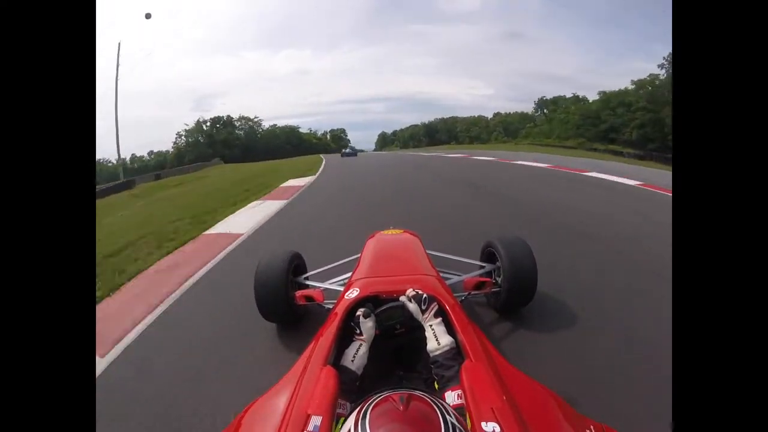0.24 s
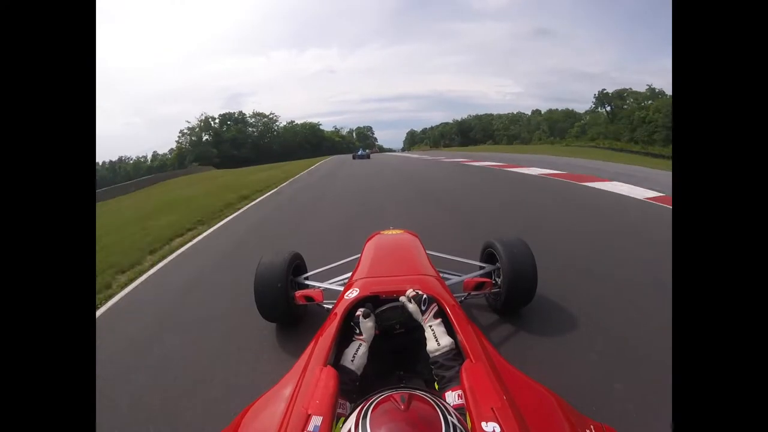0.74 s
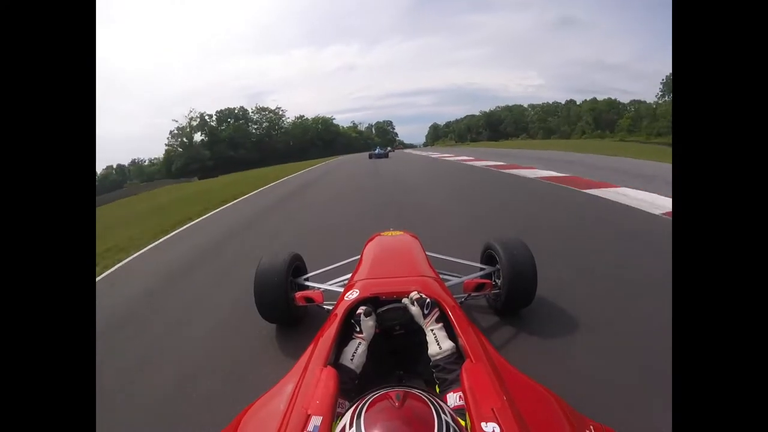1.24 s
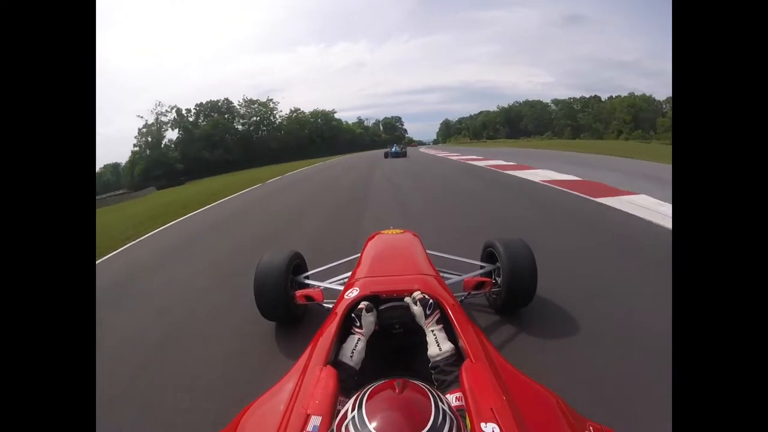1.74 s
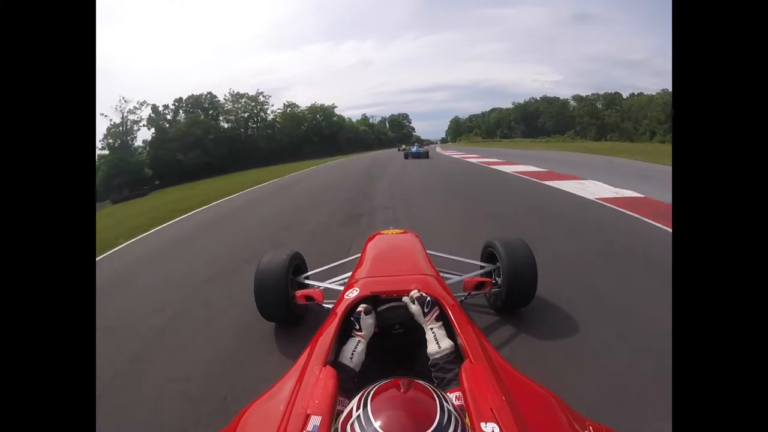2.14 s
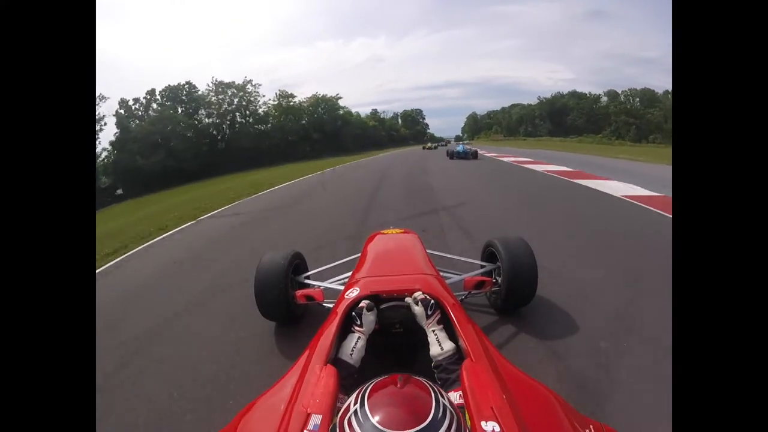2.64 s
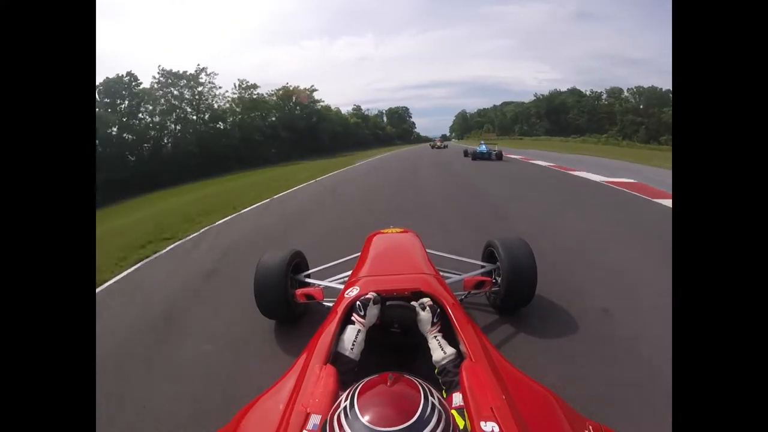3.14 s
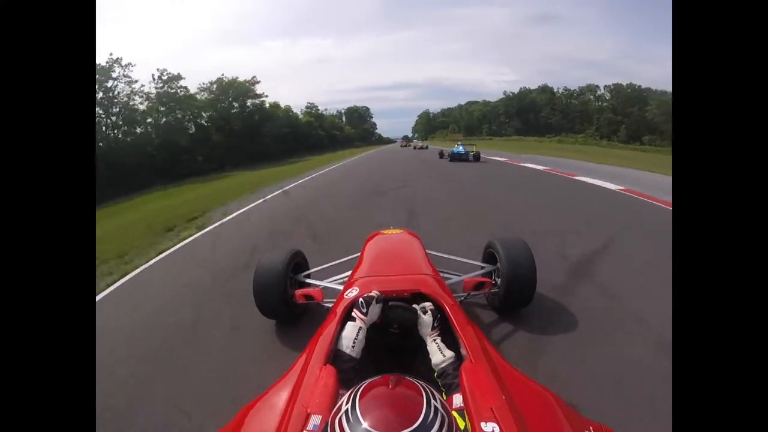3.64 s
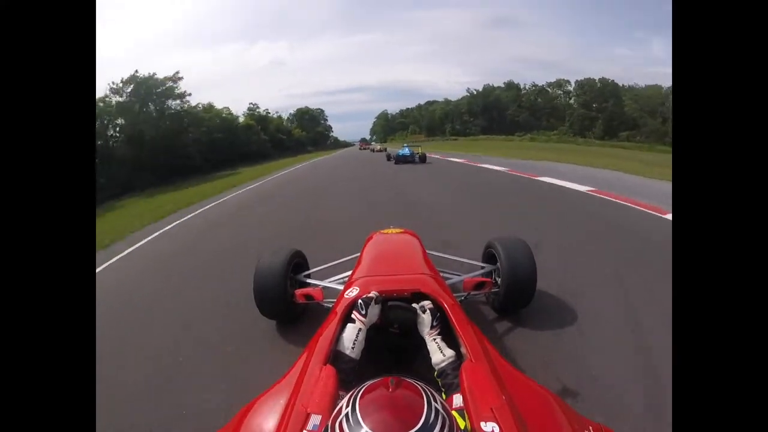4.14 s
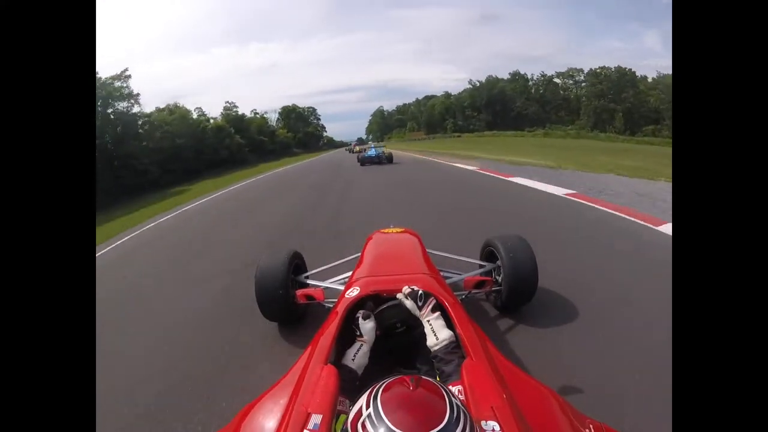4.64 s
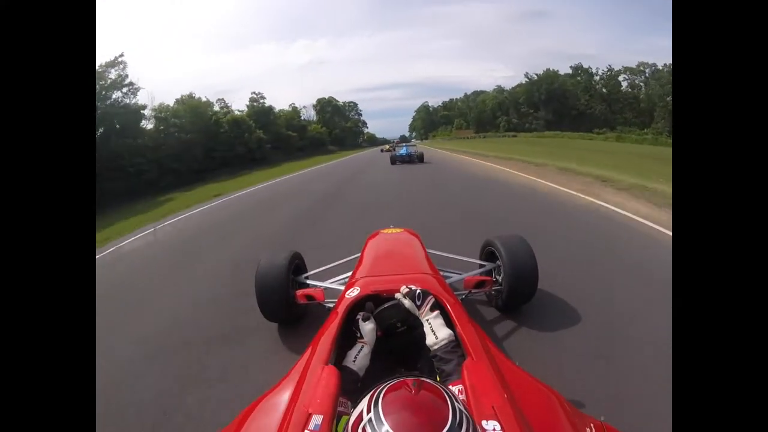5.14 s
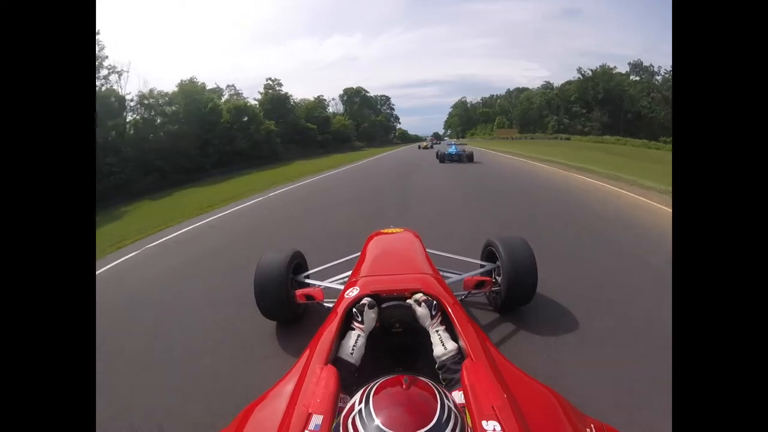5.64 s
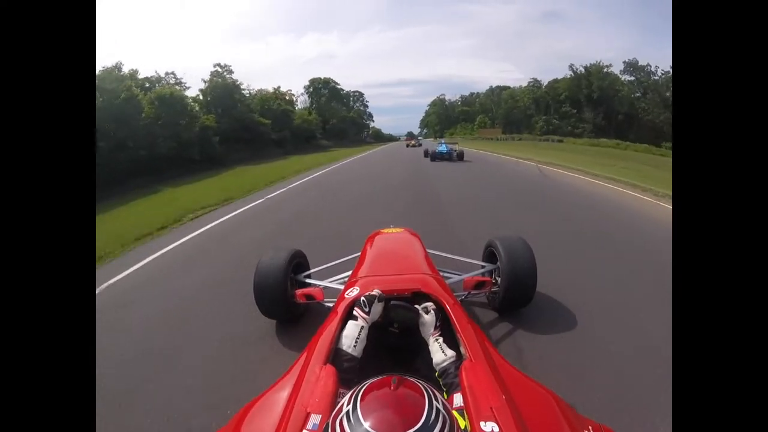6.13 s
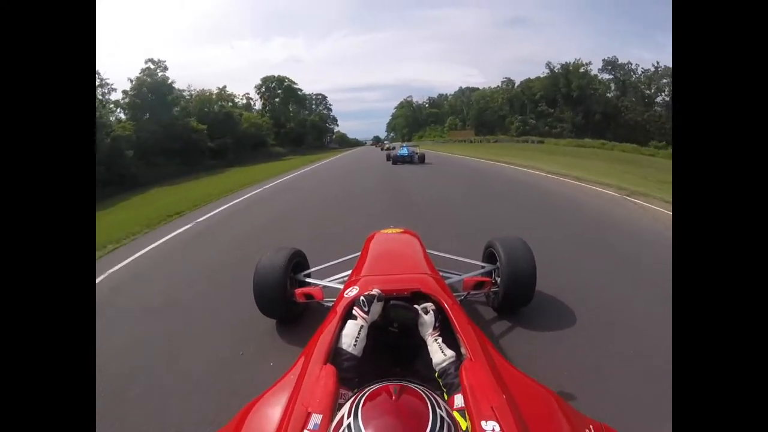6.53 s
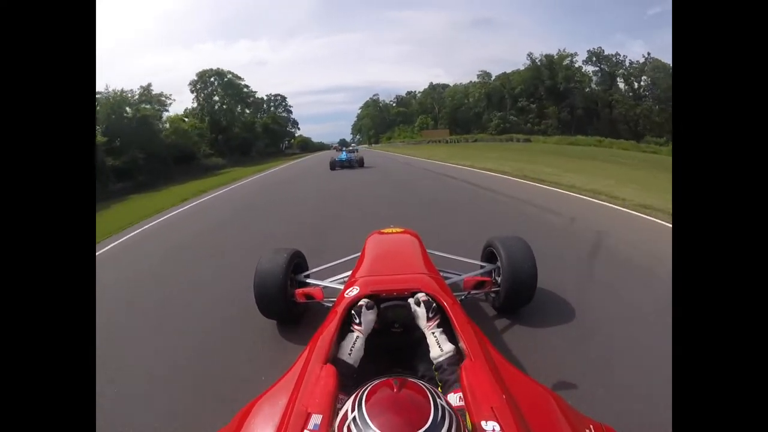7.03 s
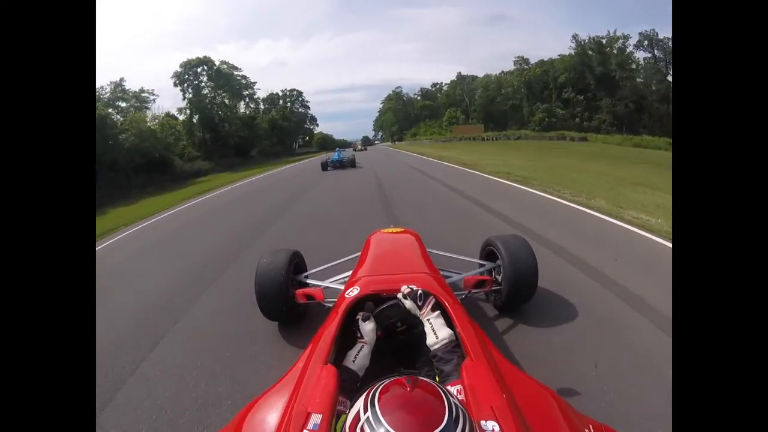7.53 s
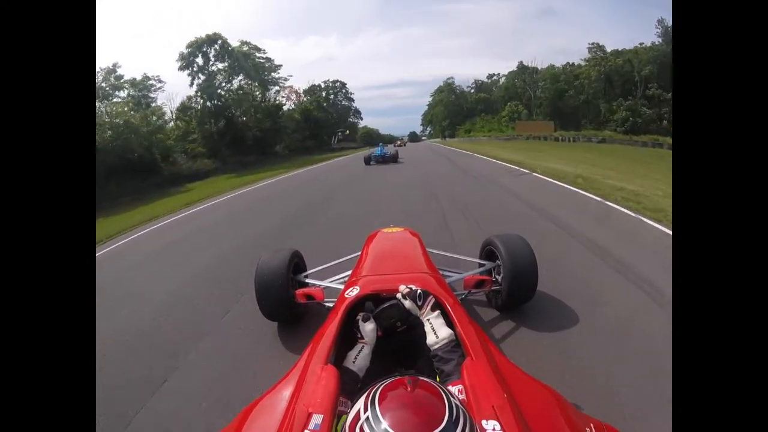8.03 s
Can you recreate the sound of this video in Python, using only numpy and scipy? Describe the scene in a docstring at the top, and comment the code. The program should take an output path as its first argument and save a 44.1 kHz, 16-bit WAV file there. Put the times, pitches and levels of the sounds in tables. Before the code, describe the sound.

Close above the driver in an open-wheel racing car, a four-cylinder engine barks hard and climbs slightly for a second and a half. The throttle snaps shut, the pitch jolts, soft low thumps burble, and a smooth booming hum slides down. Later come dull throttle dabs and a quick cluster of ringing pops. Wind buffets and rushes throughout, easing as the car slows; the closed microphone housing muffles the top.

```python
"""The open cockpit of an open-wheel racing car, from a microphone in a closed housing above the driver's head.
A four-cylinder engine pulls at full throttle, lifts, and slows with short dabs of throttle. Its firing note is
a wavering near-sine booming in the bodywork; the open intake barks in lines at quarters of the firing rate and
whistles as gas blows on its cavities. After the lift come soft low thumps, later the ringing pops of ragged
firings. Wind is coloured noise buffeting the housing and rushing past; grit ticks on it as short noise bursts."""
import sys
import numpy as np
from scipy import signal
from scipy.fft import rfft, irfft, next_fast_len
from scipy.io import wavfile
from scipy.ndimage import uniform_filter1d

SR = 44100
rng = np.random.default_rng(int(sys.argv[2]) if len(sys.argv) > 2 else 0)


def wav_record(signal):
    """Record a signal, one row per channel, as 16-bit PCM in the file named by sys.argv[1]."""
    frames = np.transpose(np.atleast_2d(signal))
    bounded = np.clip(frames, -1, 1)
    # unit amplitude maps onto the largest positive 16-bit level
    quanta = np.round(bounded * 32767).astype(np.int16)
    wavfile.write(sys.argv[1], SR, quanta)


N = 365148


def undb(db):
    """Gain of a level in dB."""
    return 10 ** (np.asarray(db) / 20)


def seconds():
    """Time of every sample in seconds."""
    return np.arange(N) / SR


def curves(table):
    """The columns of a table after its time column, joined by straight lines, one value per sample."""
    time_s, *columns = np.transpose(table)
    return [np.interp(seconds(), time_s, column) for column in columns]


def colour_db(table, hz):
    """Level of a spectrum at the given frequencies; silent outside the table."""
    points_hz, level_db = np.transpose(table)
    return np.interp(np.log(hz), np.log(points_hz), level_db, left=-120, right=-120)


def bandpass(x, low_hz, high_hz):
    """Second-order band-pass, used for narrow resonances and for bright clicks."""
    return signal.sosfilt(signal.butter(2, [low_hz, high_hz], "bandpass", fs=SR, output="sos"), x)


def walk(rate_hz):
    """Random levels held for 1 / rate_hz seconds and smoothed twice; spread 1."""
    hold = int(SR / rate_hz)
    steps = np.repeat(rng.standard_normal(N // hold + 1), hold)
    smooth = uniform_filter1d(uniform_filter1d(steps, hold), hold)[:N]
    return smooth / np.std(smooth)


def noise(table, shared_db, own_db, rate_hz):
    """Coloured noise of rms 1 whose octave bands swell together and flicker alone."""
    size = next_fast_len(N)
    hz = np.maximum(np.arange(size // 2 + 1) * SR / size, 1)
    shaped = rfft(rng.standard_normal(size)) * undb(colour_db(table, hz))
    out = np.zeros(N)
    swell = walk(rate_hz)
    first, last = np.log2(table[0][0]), np.log2(table[-1][0])
    for octave in np.arange(np.floor(first), last + 1):
        # neighbouring bands cross-fade over an octave
        share = np.cos(np.pi / 2 * np.clip(np.log2(hz) - octave, -1, 1)) ** 2
        band = irfft(shaped * share, size)[:N]
        out += band * undb(shared_db * swell + own_db * walk(rate_hz))
    return out / np.std(out)


# engine speed before the driveline swings: time_s, firing_rate_hz
ENGINE_SPEED = [(0, 291.2), (.3, 296.2), (1.46, 312.2), (1.485, 300), (1.515, 282), (1.524, 235),
                (1.545, 215), (1.553, 260), (1.575, 295), (1.61, 301), (1.69, 304.3), (1.8, 303.8),
                (2.1, 294), (2.4, 280.5), (3.1, 244.2), (3.35, 233.7), (3.62, 223.5), (4, 216.3),
                (4.75, 203.3), (4.9, 205.5), (5.02, 212), (5.045, 215), (5.07, 209), (5.2, 205), (5.3, 198),
                (5.62, 199), (6.05, 192.5), (6.27, 192), (6.32, 198), (6.47, 195), (6.53, 194),
                (6.62, 197.3), (6.85, 200.2), (7.07, 199.8), (7.16, 195), (7.26, 196), (7.34, 200),
                (7.38, 195), (7.5, 195.5), (8.28, 183.6)]
# the driveline winds up and swings back when the load changes: start_s, swing_hz, swings_per_s, decay_s
DRIVELINE_SWINGS = [(5.046, -18.5, 4.44, .15), (5.33, -9.5, 5.7, 0.22), (6.312, 35, 7.5, 0.11),
                    (7.165, -8, 5.5, .25)]


def firing_rate():
    """Engine speed plus decaying sine swings of the driveline."""
    hz, = curves(ENGINE_SPEED)
    for start_s, swing_hz, swings_per_s, decay_s in DRIVELINE_SWINGS:
        age = np.maximum(seconds() - start_s, 0)
        hz = hz + swing_hz * np.exp(-age / decay_s) * np.sin(2 * np.pi * swings_per_s * age)
    return hz


# throttle openings: open_s, close_s, bark_db, treble_loss_db_per_octave, unevenness_db, whistle_db, fade_db_per_s
THROTTLE_OPENINGS = [(-.1, 1.44, -35.5, .5, -38, -49.5, -2), (4.85, 5.26, -42.5, 30, -59, -72, 0),
                     (6.215, 6.24, -43, 25, -60, -72, 0), (6.31, 6.51, -40.5, 13, -56, -68, 0),
                     (6.57, 6.89, -40.5, 9.5, -49, -70, 2), (6.93, 7.07, -41, 15, -56, -77, -8)]
# bark left with the throttle shut: time_s, bark_db
SHUT_BARK_LEVEL = [(0, -62), (3.55, -62), (3.8, -53), (4.2, -49), (4.55, -50), (4.75, -60), (5.4, -58),
                   (6, -54), (7.2, -55), (7.4, -56), (7.6, -47), (7.85, -55), (7.97, -46.5), (8.18, -48),
                   (8.28, -54)]
# the rest with the throttle shut: treble_loss_db_per_octave, unevenness_db, whistle_db
SHUT_THROTTLE = (23.5, -63, -79.5)
OPENING_S, CLOSING_S = .06, .035


def throttle():
    """Bark, treble loss, unevenness and whistle move from shut values to those of each opening and back."""
    t = seconds()
    shut = np.array(curves(SHUT_BARK_LEVEL) + [np.full(N, value) for value in SHUT_THROTTLE])
    moved, total = 0, 0
    for open_s, close_s, bark_db, loss_db, uneven_db, whistle_db, fade_db_per_s in THROTTLE_OPENINGS:
        opening = np.interp(t, [open_s - OPENING_S, open_s, close_s, close_s + CLOSING_S], [0, 1, 1, 0])
        fade = fade_db_per_s * (t - open_s)
        # as the bark fades, its treble, the uneven lines and the whistle fade faster
        opened = np.array([bark_db + fade, loss_db - fade, uneven_db + 2 * fade, whistle_db + 3 * fade])
        moved = moved + opening * (opened - shut)
        total = total + opening
    return shut + moved / np.maximum(total, 1)  # overlapping openings are averaged


# the firing note: time_s, level_db, octave_level_db, flutter_depth_db
NOTE_LEVELS = [(0, -29.5, -34, 2), (.45, -30.5, -32.5, -3), (1.1, -39, -31.5, 1), (1.44, -41.5, -33.5, -2),
               (1.458, -42, -33.5, 0), (1.468, -44, -52, 0), (1.478, -42, -52, 0), (1.488, -28, -39, 0),
               (1.512, -29, -40, 0), (1.521, -38, -46, 0), (1.532, -29, -48, 0), (1.543, -30, -48, 0),
               (1.552, -40, -49, 0), (1.565, -31, -49, 0), (1.58, -31, -49, 0), (1.592, -40, -49, 0),
               (1.606, -26, -49, 0), (1.625, -37, -49, 0), (1.655, -42, -49, 0), (1.685, -31, -49, 0),
               (1.8, -32, -50, -1.5), (2.03, -29.5, -55, 1.5), (2.24, -33, -53, -1), (2.27, -46, -48, 0),
               (2.34, -44, -45, 1), (2.47, -28.5, -43, -3), (2.66, -24.5, -43.5, 0.5),
               (2.8, -23.5, -38.5, 3.5), (3, -25, -39.5, 2.5), (3.22, -20, -42.5, -0.5),
               (3.36, -18.5, -48, -1), (3.58, -19.5, -42.5, 0), (3.75, -20, -45.5, 0), (4, -20.5, -40, 0.3),
               (4.3, -21, -40, -0.5), (4.6, -19.5, -41.5, 1.5), (5, -22, -52.5, 2.5), (5.2, -22, -47, 2),
               (5.38, -20, -50.5, 1), (5.44, -19, -44.5, 1), (5.52, -23.5, -43, 2.5),
               (5.8, -20.5, -38.5, 0), (6.05, -21, -40, 1.5), (6.2, -21.5, -43.5, 1.5), (6.3, -20, -44, .5),
               (6.33, -25, -42, .3), (6.347, -20.5, -38, .3), (6.358, -30, -42, .3), (6.372, -30, -47, .3),
               (6.385, -19, -46, .5), (6.6, -22, -47.5, 1.5), (7, -22, -49.5, 2.5), (7.3, -21, -43, 3.5),
               (7.5, -21, -38.5, 2), (7.75, -20.5, -42, 2), (8.05, -21.5, -43.5, 3), (8.28, -22, -47.5, 2)]
# raggedness of the note's octave: time_s, roughness (0-1)
OCTAVE_RAGGEDNESS = [(0, .15), (1.5, .15), (2.4, .5), (2.75, 1), (3.3, 1), (3.5, .5), (3.8, .3), (6.2, .25),
                     (6.5, .7), (7.2, .6), (7.45, .4), (8.28, .5)]
FLUTTER_HZ = 14


def firing_note(firings):
    """The exhaust note booming in the bodywork: nearly a sine that wavers, with a more ragged octave."""
    note_db, octave_db, flutter_db = curves(NOTE_LEVELS)
    # short dips of the note, or short rises where the depth is negative
    flutter = .7 - 2 * np.cos(np.pi * FLUTTER_HZ * seconds() + 1.38 * walk(5)) ** 4
    note_db = note_db + flutter_db * flutter
    angle, waver = 2 * np.pi * firings, 0.14 * walk(40)
    note = undb(note_db + 0.48 * walk(40)) * np.cos(angle + waver)
    ragged, = curves(OCTAVE_RAGGEDNESS)
    octave_gain = undb(octave_db + ragged * 3.5 * walk(40))
    octave = octave_gain * np.cos(2 * angle + waver + ragged * 1.1 * walk(45))
    return np.sqrt(2) * (note + octave)


# colour of the bark on whole multiples of the firing rate: pitch_hz, level_db
BARK_COLOUR = [(400, -3), (600, 0), (800, -1), (900, 0), (1000, -12), (1165, -10), (1195, -4), (1235, -7),
               (1290, -8), (1390, 0), (1465, -10), (1492, -4.5), (1545, -13), (1595, -5), (1760, -14),
               (1790, -12), (1830, -15), (1875, -10), (1990, -11), (2050, -17), (2095, -14), (2150, -21),
               (2340, -21), (2400, -15), (2450, -19), (2800, -25), (3800, -34)]
# colour of the lines of unequally firing cylinders: pitch_hz, level_db
UNEVEN_COLOUR = [(150, -12), (230, -7), (330, -16), (550, -12), (700, -19), (850, -15), (900, -8),
                 (950, -10), (975, -2), (1003, -10), (1025, -14), (1048, -12), (1085, -13), (1115, -23),
                 (1280, -23), (1390, -14), (1425, -8), (1570, -11), (1730, -16), (1870, -10), (1960, -15),
                 (2300, -18), (2550, -14), (2800, -22), (3300, -27)]
# uneven lines that stand out at any speed: multiple of the firing rate: rise_db
STRONG_UNEVEN_LINES = {1.5: 3, 1.75: 4, 2.75: 8, 3.5: 7, 4.5: 2, 5.5: 3, 5.75: 3, 6.75: 3, 9.25: 5}
PATCHY_DB = 1.3  # spread of each line's own swelling, in full from the sixth multiple up


def intake(firings, hz, bark_db, loss_db, uneven_db):
    """One sharp pulse a firing, duller at part throttle; unequal cylinders add lines at quarters of the rate."""
    out = np.zeros(N)
    step = 64  # samples over which each level is held

    def held(gain):
        """Stretch stepped gains back to one value per sample."""
        return np.repeat(gain, step)[:N]

    hz, bark_db, loss_db, uneven_db = hz[::step], bark_db[::step], loss_db[::step], uneven_db[::step]
    phase = 2 * np.pi * rng.random(48)
    angle = 2 * np.pi * firings + .01 * walk(73)
    for quarter in range(3, 48):
        order = quarter / 4
        patch = uniform_filter1d(rng.standard_normal(len(hz)), size=60)
        patch = undb(PATCHY_DB * min(order / 6, 1) * patch / np.std(patch))
        octaves_above = np.maximum(np.log2(order * hz / 1100), 0)  # over the air box's top resonance
        line_db = colour_db(UNEVEN_COLOUR, order * hz) + uneven_db - 2 * loss_db * octaves_above
        uneven = undb(line_db + STRONG_UNEVEN_LINES.get(order, 0))
        if quarter % 4:
            out += held(uneven * patch) * np.cos(order * angle + phase[quarter])
        elif order > 2:
            bark = undb(colour_db(BARK_COLOUR, order * hz) + bark_db - loss_db * np.log2(order / 3))
            out += held(np.hypot(bark, uneven) * patch) * np.cos(order * angle)
    # every firing has its own strength
    strength = undb(0.29 * rng.standard_normal(N // 50))[np.floor(firings + .5).astype(int)]
    return np.sqrt(2) * out * uniform_filter1d(strength, size=40)


# intake resonances that the gas blows on: pitch_hz, width_hz, level_db
INTAKE_CAVITIES = [(3600, 55, -4.5), (4350, 220, -3), (4776, 260, 1.5)]
# relative snap of each cylinder's intake valve, in firing order (linear)
VALVE_SNAPS = (1, .55, .8, .45)
VALVE_DB = 26.5  # snap of a full-strength valve against the puffs


def whistle(firings, whistle_db):
    """Gas puffs each firing and most once an engine cycle, valves snap shut, and intake cavities sing to both."""
    cycle_puff = np.cos(np.pi * firings / 4) ** 4
    firing_puff = 0.73 * np.cos(np.pi * firings) ** 2
    blown = rng.standard_normal(N) * (.5 + cycle_puff + firing_puff)
    fired = np.floor(firings).astype(int)
    blown += undb(VALVE_DB) * np.diff(fired, prepend=0) * np.array(VALVE_SNAPS)[fired % 4]
    out = np.zeros(N)
    for pitch_hz, width_hz, level_db in INTAKE_CAVITIES:
        out += undb(level_db) * bandpass(blown, pitch_hz - width_hz / 2, pitch_hz + width_hz / 2)
    return undb(whistle_db) * out / np.std(out)


# short spells of louder rustle: start_s, end_s, rise_db
RUSTLE_SPELLS = [(3.925, 3.99, 4), (4.45, 4.62, 2.5), (4.78, 4.9, 3), (5.0, 5.07, 5), (5.1, 5.225, 4),
                 (5.495, 5.62, 5), (5.64, 5.69, 6), (5.73, 5.87, 4.5)]
SPELL_EDGE_S = .012


def spells():
    """Rise of the rustle in dB during each spell, with quick edges."""
    rise = np.zeros(N)
    for start_s, end_s, rise_db in RUSTLE_SPELLS:
        corners = [start_s - SPELL_EDGE_S, start_s, end_s, end_s + SPELL_EDGE_S]
        rise += np.interp(seconds(), corners, [0, rise_db, rise_db, 0])
    return rise


# wind at the housing: time_s, buffet_db, roar_db, rush_db, rustle_db, hiss_db
WIND_LEVELS = [(0, -33.5, -36, -41.5, -47.5, -52.5), (.6, -30, -34.5, -41, -47, -52.5),
               (1.15, -34, -36, -42, -51, -60), (1.3, -31.5, -33.5, -40.5, -49.5, -57),
               (1.47, -32, -35.5, -39.5, -51, -60.5), (1.6, -30.5, -31.5, -39, -48.5, -60.5),
               (1.8, -33, -32.5, -40, -52, -63.5), (2.05, -30.5, -32.5, -40.5, -51, -64),
               (2.3, -36, -33.5, -39.5, -50.5, -64), (2.85, -33.5, -34.5, -40.5, -52.5, -68.5),
               (3.3, -35.5, -37.5, -44.5, -56.5, -73.5), (3.7, -40.5, -40.5, -48, -61, -78),
               (4.3, -38.5, -39.5, -48, -59.5, -74.5), (4.55, -37, -38, -49, -59.5, -72.5),
               (4.85, -41.5, -39.5, -48, -58.5, -68.5), (5.1, -36.5, -39.5, -47, -58.5, -65),
               (5.4, -39.5, -39, -49, -59.5, -66.5), (5.55, -35, -38.5, -49.5, -61, -66.5),
               (5.85, -37, -37.5, -48, -59.5, -69), (6.15, -37.5, -38.5, -47.5, -59.5, -73),
               (6.42, -42, -36.5, -47, -62, -72), (6.6, -45.5, -37, -49.5, -61, -73),
               (6.9, -42, -38.5, -48.5, -61.5, -71), (7.25, -39, -36, -50.5, -62.5, -74),
               (7.5, -33.5, -39, -51.5, -64, -74), (7.85, -35.5, -38.5, -52, -64, -73),
               (8.28, -37.5, -41, -52, -64.5, -70.5)]
# gain of the buffet's part over 90 Hz: time_s, gain_db
BUFFET_TOP_GAIN = [(0, -4), (1.2, -1), (1.7, -6), (2.4, -0.5), (4, 0.5), (6.8, 0.5), (7.4, -2),
                   (8.28, -3.5)]
# colours of the wind's five bands, low to high: pitch_hz, density_db (relative, per Hz)
BUFFET_COLOUR = [(12, -25.5), (22, -8.5), (45, 1), (70, 1.5), (120, -1.5), (220, -4.5), (330, -25.5),
                 (520, -39.5)]
ROAR_COLOUR = [(120, -22.5), (170, 4.5), (260, 0.5), (400, -4.5), (620, -4), (760, -18), (1100, -23.5),
               (1600, -45)]
RUSH_COLOUR = [(400, -8.5), (700, 1.5), (1000, -0.5), (1500, -5), (2200, -9), (3200, -17.5), (4200, -32)]
RUSTLE_COLOUR = [(1700, -14), (2600, 1.5), (3400, -1), (4400, -2.5), (5400, -9.5), (6000, -26)]
HISS_COLOUR = [(4500, -5), (5500, -2.5), (7000, -7), (8000, -14.5), (9000, -21.5), (10500, -43.5)]


def air():
    """Wind turbulence as five noise bands: it buffets the housing, roars, rushes, rustles and hisses past."""
    buffet_db, roar_db, rush_db, rustle_db, hiss_db = curves(WIND_LEVELS)
    buffet = undb(buffet_db) * noise(BUFFET_COLOUR, shared_db=1.7, own_db=1.5, rate_hz=14)
    top = signal.sosfilt(signal.butter(2, 90, "highpass", fs=SR, output="sos"), buffet)
    buffet = buffet + (undb(curves(BUFFET_TOP_GAIN)[0]) - 1) * top
    roar = undb(roar_db) * noise(ROAR_COLOUR, shared_db=0.4, own_db=0.14, rate_hz=16)
    # the upper three bands share gusts and, in part, the rustle's spells
    gust, spell_db = walk(12), spells()
    rush_db = rush_db + 0.37 * spell_db + .55 * gust
    rush = undb(rush_db) * noise(RUSH_COLOUR, shared_db=0.73, own_db=0.06, rate_hz=12)
    rustle_db = rustle_db + spell_db + .3 * gust
    rustle = undb(rustle_db) * noise(RUSTLE_COLOUR, shared_db=.7, own_db=.3, rate_hz=24)
    hiss_db = hiss_db + .3 * gust + .3 * spell_db
    hiss = undb(hiss_db) * noise(HISS_COLOUR, shared_db=.8, own_db=.8, rate_hz=24)
    return buffet + roar + rush + rustle + hiss


# grit ticking on the housing: start_s, level_db (nominal, before the click's make-up gain and filter)
GRIT_TICKS = [(1.0535, -54), (1.5294, -70), (2.9203, -60), (2.9284, -60), (3.5173, -68), (4.4794, -74),
              (7.4096, -68), (8.0976, -63), (8.108, -60)]


def ticks():
    """Each grain is a dry, bright click: noise that decays with a time constant of 0.6 ms."""
    out = np.zeros(N)
    age = np.arange(200) / SR
    for start_s, level_db in GRIT_TICKS:
        start = int(start_s * SR)
        click = np.exp(-age / .0006) * rng.standard_normal(len(age))
        out[start:start + len(age)] += undb(level_db + 4.5) * click
    return bandpass(out, 4000, 9500)


# thumps as the engine burbles after the lift: start_s, pitch_hz, level_db, cycles
BURBLE_THUMPS = [(1.44, 100, -26, 2), (1.51, 60, -23, 2), (1.545, 135, -23, 2.5), (1.577, 100, -23, 2),
                 (1.608, 75, -22, 2), (1.675, 140, -25, 2), (1.765, 60, -23, 2.5), (1.82, 55, -20, 2),
                 (1.882, 170, -21, 4), (1.895, 70, -23, 2), (2.075, 80, -24, 2), (2.32, 210, -24, 5),
                 (2.513, 540, -26, 3.5)]


def thumps():
    """Each burble of the engine is a few cycles of a sine that swells and fades softly."""
    out = np.zeros(N)
    for start_s, pitch_hz, level_db, cycles in BURBLE_THUMPS:
        age = np.arange(int(cycles / pitch_hz * SR)) / SR
        start = int(start_s * SR)
        thump = np.hanning(len(age)) * np.sin(2 * np.pi * pitch_hz * age)
        out[start:start + len(age)] += undb(level_db) * thump
    return out


# ragged firings that ring the air box: start_s, level_db (nominal), pitch_hz
RAGGED_POPS = [(6.225, -39, 949), (6.238, -35, 894), (6.255, -41, 1050), (6.265, -29, 870),
               (6.286, -36, 940), (6.298, -35, 955), (6.316, -28, 894), (6.325, -33, 920),
               (6.335, -29, 964), (6.344, -30, 955), (6.353, -29.5, 930), (6.362, -32, 930),
               (6.372, -36, 1030), (6.403, -38, 1000), (6.415, -35, 930), (6.427, -43, 980),
               (6.436, -36.5, 950)]


def pops():
    """Each ragged firing is a short ring of the air box with weaker, quicker overtones."""
    out = np.zeros(N)
    age = np.arange(800) / SR
    attack = 1 - np.exp(-age / .0004)
    for start_s, level_db, pitch_hz in RAGGED_POPS:
        angle = 2 * np.pi * pitch_hz * age
        ring = np.exp(-age / 0.0037) * np.sin(angle)
        overtones = .5 * np.sin(1.55 * angle) + .15 * np.sin(1.95 * angle)
        ring += np.exp(-age / .002) * overtones
        start = int(start_s * SR)
        out[start:start + len(age)] += undb(level_db) * 1.6 * attack * ring
    return out


def scene():
    """Engine, wind and grit summed at one microphone."""
    hz = firing_rate()
    firings = np.cumsum(hz) / SR  # firings so far, with fractions
    bark_db, loss_db, uneven_db, whistle_db = throttle()
    engine = firing_note(firings) + intake(firings, hz, bark_db, loss_db, uneven_db)
    engine = engine + whistle(firings, whistle_db) + pops() + thumps()
    return (engine + air() + ticks())[None]


# cavities of the housing in front of the microphone: pitch_hz, width_hz, gain_db
HOUSING_CAVITIES = [(5940, 190, -12.5), (6520, 320, 9.5)]
TOP_HZ = 11000


def record(dry):
    """The housing's cavities colour the treble; a steep low-pass cuts the top."""
    size = next_fast_len(N + SR)
    hz = np.arange(size // 2 + 1) * SR / size
    db = np.zeros(len(hz))
    for pitch_hz, width_hz, gain_db in HOUSING_CAVITIES:
        db += gain_db / (1 + (2 * (hz - pitch_hz) / width_hz) ** 2)
    boxed = irfft(rfft(dry, size) * undb(db), size)[:, :N]
    return signal.sosfilt(signal.ellip(8, .2, 70, TOP_HZ, fs=SR, output="sos"), boxed)


dry = scene()
out = record(dry)
wav_record(out)
```